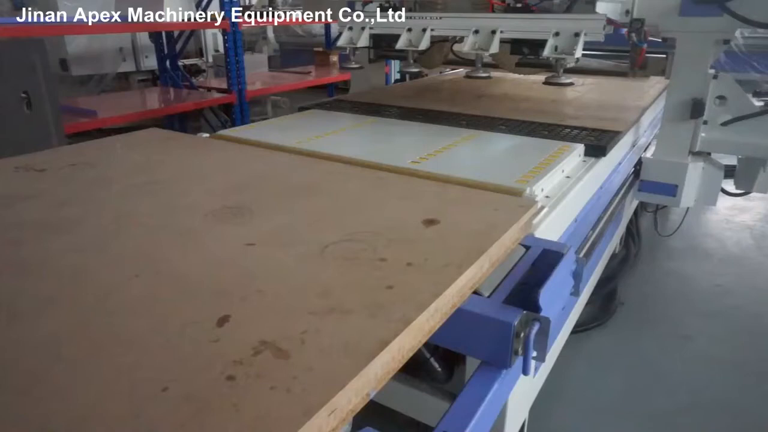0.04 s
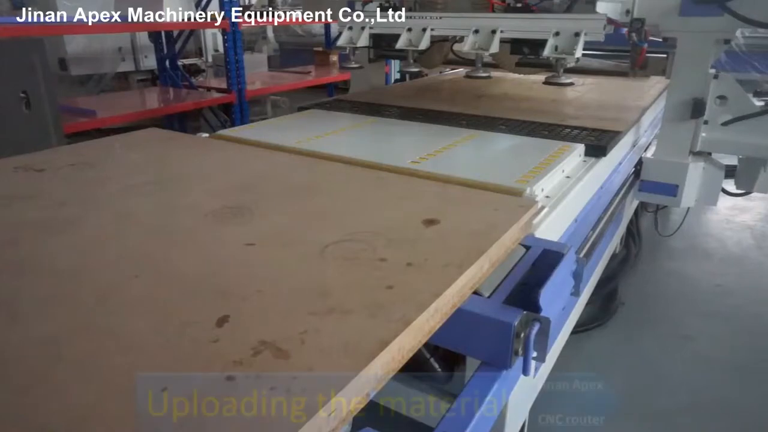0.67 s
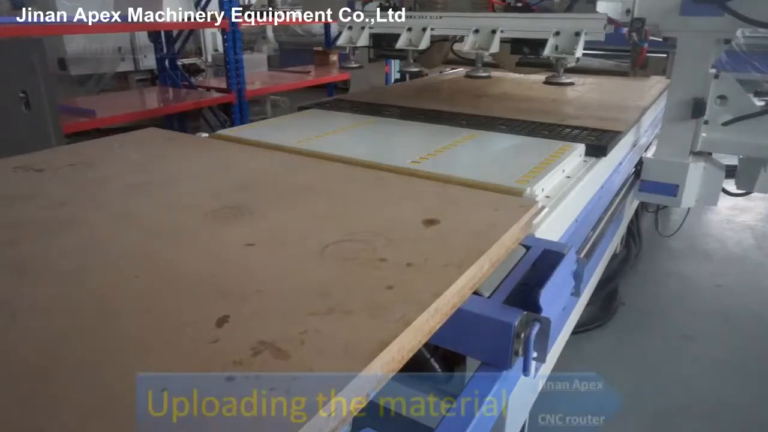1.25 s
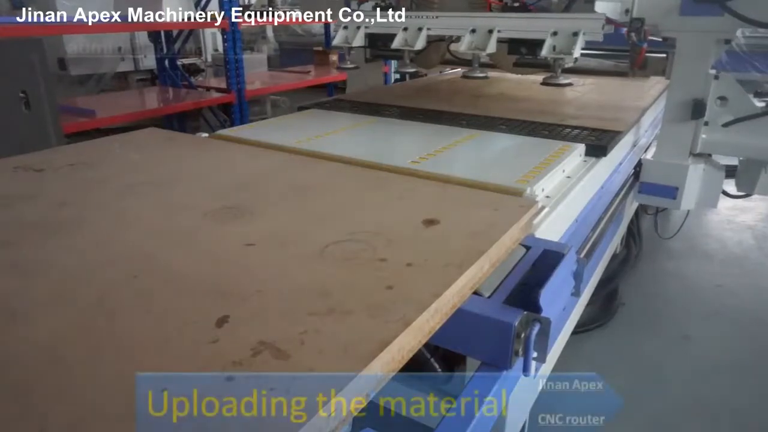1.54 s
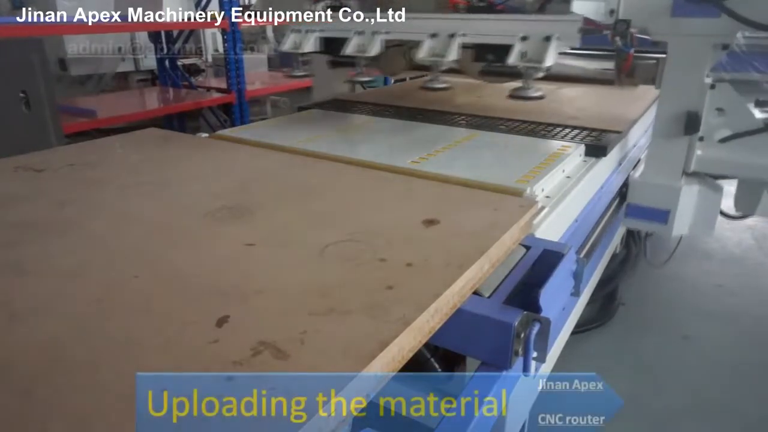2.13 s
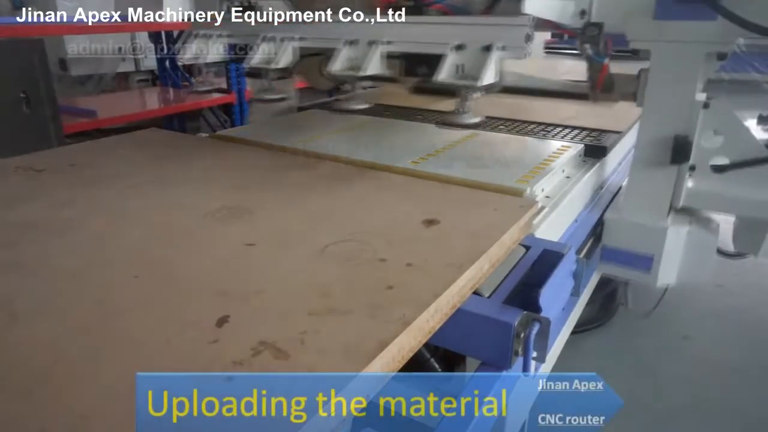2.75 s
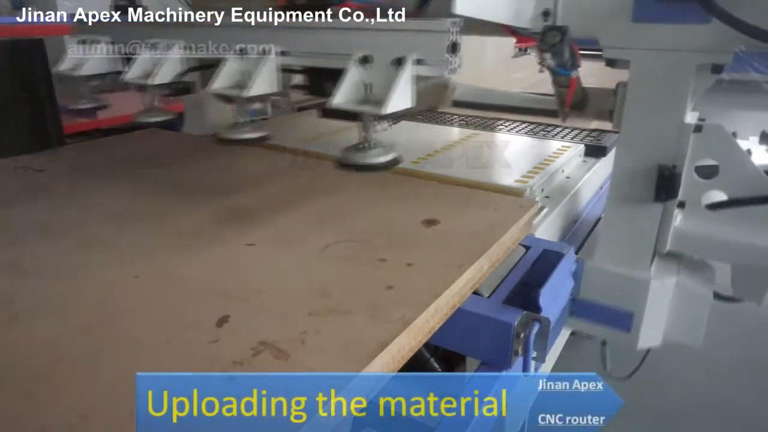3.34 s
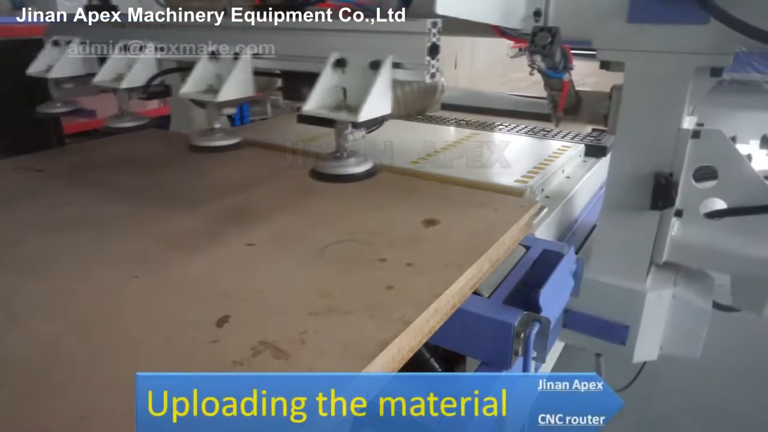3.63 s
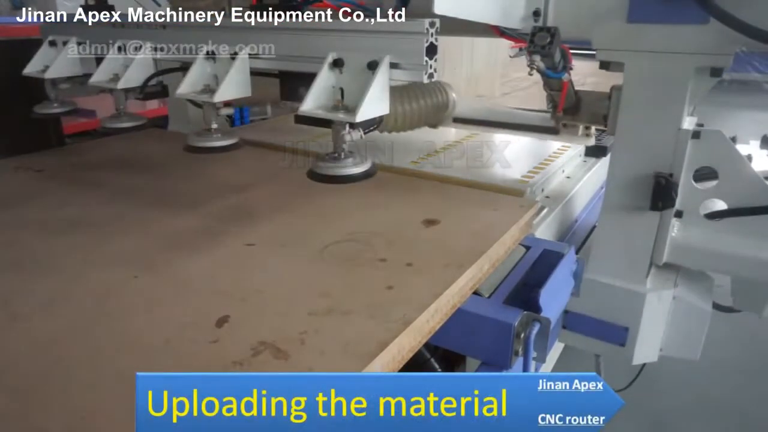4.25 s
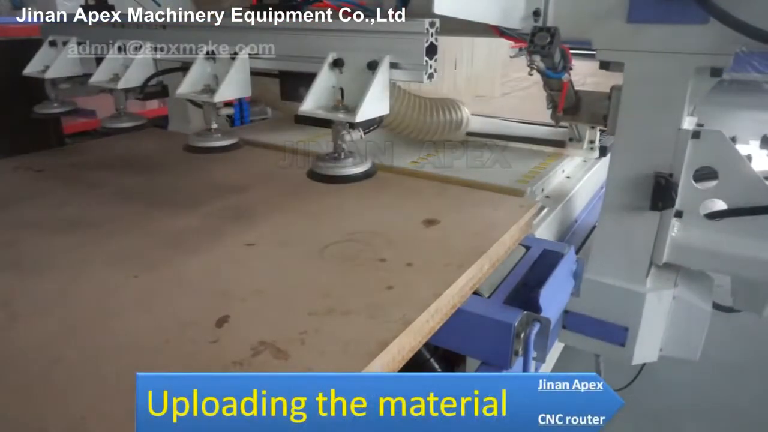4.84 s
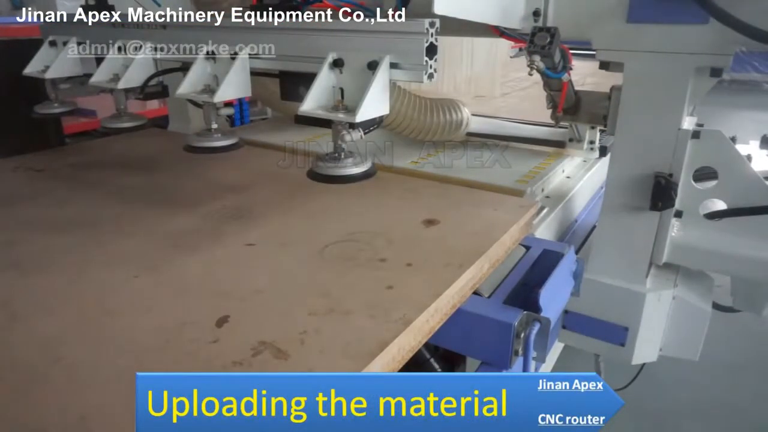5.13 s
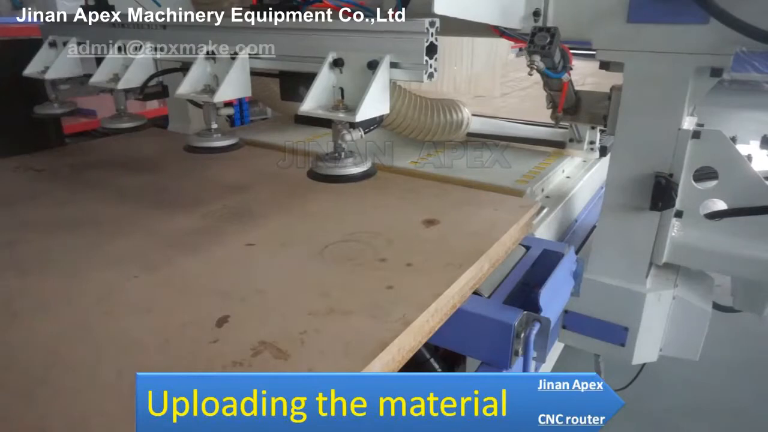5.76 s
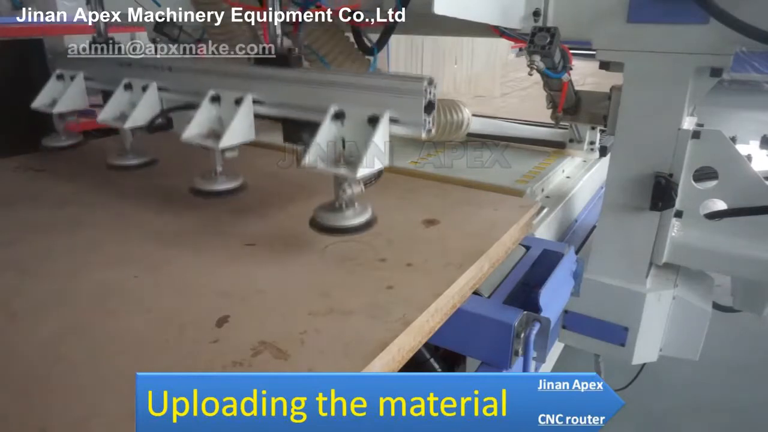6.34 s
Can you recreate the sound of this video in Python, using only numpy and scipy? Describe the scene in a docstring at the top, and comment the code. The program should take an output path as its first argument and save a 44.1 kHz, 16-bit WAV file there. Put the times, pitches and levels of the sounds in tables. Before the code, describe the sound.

A vacuum pump drones and buzzes steadily in a workshop, with a thin hiss of leaking air. A faint rumble passes as the loading arm rolls forward. Then a valve clacks and pops, and suction cups hiss loudly close to the microphone for about a second. After a lull, a second pop comes amid a few low thumps, and air rushes on. The drone dips under each blast.

```python
"""A vacuum pump drones and buzzes in a workshop, its vanes chopping the air for a CNC router.
The floor rumbles as the gantry, the machine's moving bridge, rolls the loading arm forward.
A valve clacks and pops to drop the arm, and its suction cups hiss on a board. Amid a few low thumps
a second valve pops to lift it, and air rushes on. The camera's gain control turns the drone down
under each blast of air."""
import sys
import numpy as np
from scipy import signal
from scipy.fft import rfft, irfft, next_fast_len
from scipy.io import wavfile
from scipy.ndimage import uniform_filter1d, map_coordinates

SR = 44100
rng = np.random.default_rng(int(sys.argv[2]) if len(sys.argv) > 2 else 0)


def dump_mix(stems):
    """Bounce the given channels to the path in sys.argv[1] as a 16-bit WAV at rate SR."""
    frames = np.atleast_2d(stems).T  # one column per channel
    limited = np.clip(frames, -1, 1)  # hard clip at full scale
    pcm = np.round(limited * 32767).astype(np.int16)
    wavfile.write(sys.argv[1], SR, pcm)


N = 281799
T = np.arange(N) / SR


def amp(db):
    """Turn decibels into a factor to multiply by."""
    return 10 ** (np.asarray(db) / 20)


def unit(x):
    """Scale a signal to an average strength (rms) of 1."""
    return x / np.sqrt(np.mean(x ** 2) + 1e-20)


def along(points, hz):
    """Read between (frequency, value) points, giving each octave equal room."""
    f, v = np.transpose(points)
    return np.interp(np.log(hz + 1), np.log(f + 1), v)


def ramp(start, length):
    """0 before start, then rising evenly to 1 over length seconds."""
    return np.clip((T - start) / max(length, 1e-3), 0, 1)


def gate(start, end, attack, release):
    """Rise to 1 from start, hold until end, then fall back to 0."""
    return ramp(start, attack) * (1 - ramp(end, release))


def wobble(rate):
    """A smooth curve through rate random values a second."""
    return map_coordinates(rng.standard_normal(int(N * rate / SR) + 4), [T * rate])


def filtered(x, response):
    """Multiply each frequency in x by the gain that response gives it."""
    size = next_fast_len(N + 8192)
    return irfft(rfft(x, size) * response(np.fft.rfftfreq(size, 1 / SR)), size)[..., :N]


def peaks(modes, hz):
    """The gain of resonances, the pitches at which a thing likes to ring."""
    return np.sqrt(sum(amp(db) ** 2 / (1 + ((hz - centre) / width) ** 2) ** 2
                       for centre, width, db in modes))


def spread(pair, colour):
    """Make two unrelated signals one source in the room: bass alike in both ears, treble not."""
    # how alike the ears hear the room: f/Hz, likeness (1 = the same)
    alike = [(100, .88), (400, .97), (1000, .5), (4000, .08), (11000, .05)]
    # balance between the ears: f/Hz, left minus right/dB
    lean = [(200, -1.5), (400, 2.5), (700, 2.5), (2500, 2.5), (6000, 3), (12000, 0)]
    angle = lambda hz: np.arccos(np.clip(along(alike, hz), -1, 1)) / 2
    mid, side = filtered(pair, lambda hz: colour(hz) * [np.cos(angle(hz)), np.sin(angle(hz))])
    ears = np.array([mid + side, mid - side])
    return unit(filtered(ears, lambda hz: amp(np.outer([.5, -.5], along(lean, hz)))))


def rush(spectrum):
    """Stereo noise of strength 1, shaped by (frequency, level) points."""
    return spread(rng.standard_normal((2, N)), lambda hz: amp(along(spectrum, hz)))


def resonant(modes):
    """Stereo noise of strength 1 that rings at the given resonances."""
    return spread(rng.standard_normal((2, N)), lambda hz: peaks(modes, hz))


def whistle(pitch_hz, breadth):
    """A narrow band of noise that follows a pitch; more breadth makes it rougher."""
    phase = 2 * np.pi * np.cumsum(pitch_hz) / SR
    return unit(wobble(breadth) * np.sin(phase) + wobble(breadth) * np.cos(phase))


def hall(x, t60=.3, echo_db=-5.5):
    """Add the hall's echo, different in each ear; t60 is the seconds it takes to fade by 60 dB."""
    tail = rng.standard_normal((2, SR // 2)) * amp(-60 * T[:SR // 2] / t60)
    echo = signal.fftconvolve(x[None], tail / np.linalg.norm(tail[0]), axes=1)[:, :N]
    return x + amp(echo_db) * echo


def gantry():
    """The floor rumbles in step with the gantry's speed, and its drive groans under load."""
    # the shaking floor: f/Hz, level/dB
    rumble = [(20, -36), (32, -18), (43, -10), (56, -4), (85, -7), (140, 0), (260, -3), (450, -40),
              (900, -80)]
    # the gantry's moves: start/s, stop/s, level/dB
    travels = [(1.8, 3.6, -44.5), (5.7, 6.4, -44)]
    # the drive speeding up and braking: start/s, end/s, f/Hz, level/dB
    groans = [(1.953, 2.25, 268, -29.5), (3.498, 3.853, 351, -31)]
    idle_db = -72
    shake = sum(amp(db) * gate(start, stop, attack=.26, release=.43) for start, stop, db in travels)
    groan = sum(amp(db) * gate(start, end, attack=.1, release=.1) * whistle(np.full(N, hz), breadth=61)
                for start, end, hz, db in groans)
    return (amp(idle_db) + shake) * rush(rumble) + groan


def pump_tones(turns, facing):
    """Vanes chop the air at multiples of the shaft's speed; each tone wavers as it crosses the hall."""
    # pump tones: multiple of the shaft speed (rounded below to halves), level/dB, left minus right/dB
    tones = [(2, -45, 0), (4, -26.5, 0.5), (6, -46, 10), (8, -42.5, -18), (10, -25.5, -2), (12, -20.5, 0),
             (16, -43.5, 6.5), (19, -42.5, 10.5), (22, -47.5, 5), (24, -44, 9), (28, -44.5, 4),
             (31.95, -52, -2), (35.93, -49, 17), (37.06, -50.5, 11), (39.9, -44.5, 8), (44.2, -52, 3),
             (44.8, -51, 8), (46.1, -48.5, 11), (47, -53, 9), (48.03, -46.5, 16.5), (49, -49, 12),
             (49.8, -53, 2), (51, -54, 15), (53.3, -51, 1), (54, -43.5, 13.5), (54.84, -42, 9.5),
             (57.1, -48, 2), (58.4, -52, 6), (59, -51, 9), (60.3, -56, 7), (60.7, -46, 4),
             (62.85, -46.5, 16), (67.7, -48, 5), (87.5, -55, 4), (89.5, -56, 9), (96.5, -49, 11),
             (101, -51.5, 4), (104, -55, 11), (210, -59, 0)]
    # the low hum swells and sinks: t/s, level change/dB
    hum = [(.33, 2), (.75, 0.8), (1.85, 0), (2.1, 1), (3.13, -2), (3.35, 1), (3.55, -1), (3.9, 1),
           (4.4, -1), (4.95, 1.5), (5.3, 2.5), (6.3, 1.5)]
    # so does the middle tone: t/s, level change/dB
    middle = [(.5, 1), (1.1, 0), (2.08, 1.5), (2.25, -6), (2.45, -8), (2.6, 0), (2.95, 0.5), (3.3, -1.5),
              (4.3, -0.5), (5.05, -6), (5.5, -0.5), (6.3, -3.5)]
    # and the drone, the loudest tone: t/s, level change/dB
    drone = [(.4, -0.5), (1.3, 0), (1.75, 2.5), (2.3, 0), (2.7, -1.7), (3.8, -1.5), (4.9, -0.6),
             (5.5, -1.5), (6.3, 0.9)]
    # standing waves shift the drone between the ears: t/s, left minus right/dB
    drone_pan = [(0.3, 4.5), (1.24, 1.5), (1.6, 3), (2.0, 0.0), (2.14, 7.0), (2.56, 1), (3.63, 7.5),
                 (3.87, 3.5), (4.98, 4.0), (5.2, 7.5), (5.81, 3.5), (6.35, 3.5)]
    hum_db, middle_db, drone_db, pan_db = (np.interp(T, *np.transpose(curve))
                                           for curve in (hum, middle, drone, drone_pan))
    # standing waves also sink tone 2 and lift tone 16 as the camera turns
    shift_db = {2: -8 * facing, 4: hum_db, 10: middle_db, 12: drone_db, 16: 8 * facing}
    out, ears = np.zeros((2, N)), np.array([[.5], [-.5]])
    for multiple, db, lean_db in tones:
        k = round(2 * multiple) / 2
        whine = facing * (k > 30)  # the turn roughens and weakens the high tones
        phase = 2 * np.pi * (k * turns + rng.random()) + .13 * wobble(8.3) + .3 * whine * wobble(40)
        waver_db = .7 * wobble(3.01) + .54 * wobble(14)
        level_db = db + shift_db.get(k, -1.5 * whine) + waver_db
        if k == 12:
            lean_db = lean_db + pan_db
        apart = min(.0095 * k, 1)  # higher tones reach the ears less in step
        out += amp(level_db + ears * lean_db) * np.sin(phase + ears * apart)
    return out


def pump_buzz(turns, size=1800):
    """The vanes scrape the same way every two turns, so a loop of noise makes their buzz."""
    # the scraping vanes: f/Hz, level/dB
    buzz = [(700, -26), (1500, -9), (2200, -13), (2850, -4.5), (3400, -5.5), (4400, -5), (5050, -5),
            (5700, -21), (7500, -13), (10400, -9), (13000, -13)]
    scrapes = rng.standard_normal((2, size))
    position = turns / 2 % 1 * size
    pair = np.array([map_coordinates(scrape, [position], mode="grid-wrap") for scrape in scrapes])
    return spread(pair, lambda hz: amp(along(buzz, hz)))


def pump(facing, shaft_hz=48.925):
    """The vacuum pump: its exhaust churns in puffs, its casing rasps and its vanes drone."""
    # the churning exhaust: f/Hz, level/dB
    exhaust = [(25, -55), (60, -40), (110, -20), (180, -13), (280, -6), (345, -1), (430, -7.5), (550, -3.5),
               (680, -9), (1000, -11), (1700, -17), (4200, -24), (13000, -42)]
    # resonances of the casing: f/Hz, width/Hz, level/dB
    casing = [(2350, 170, -1.5), (2854, 180, -0.5), (4260, 300, -12), (4970, 190, -7), (10700, 300, -12.5)]
    turns = np.cumsum(shaft_hz * (1 + .0006 * wobble(6))) / SR
    turns += .125 * ramp(5.094, .022)  # a splice (a join) in the sound: the drone jumps in phase
    throb = 1 + .12 * np.sin(2 * np.pi * 2 * turns) + .1 * np.sin(2 * np.pi * 4 * turns)
    churn = amp(-23 + wobble(12)) * unit(throb * rush(exhaust))
    buzz = amp(-39) * pump_buzz(turns)
    rasp = amp(-39.5 + 1.5 * facing + 2 * wobble(15)) * resonant(casing)
    return amp(.73) * (pump_tones(turns, facing) + buzz + rasp) + churn


def table_leak(facing):
    """Air leaks into the router's table with a hiss that is louder once the camera faces it."""
    # the leaking air: f/Hz, level/dB
    leak = [(1500, -24), (3500, 1.5), (4800, -0.5), (6000, -3.5), (10500, -3.5), (13000, -7)]
    return amp(-39 + 5.5 * facing + .3 * wobble(6.7)) * rush(leak)


def machine():
    """Pump, leak and gantry stand to the left until the camera turns towards them."""
    facing = ramp(2.54, .89)  # 0 before the turn, 1 after it
    left, right = pump(facing) + table_leak(facing) + gantry()
    lag_samples = 3 * (1 - facing)  # sound from the left reaches the right ear late
    return np.array([left, map_coordinates(right, [np.arange(N) - lag_samples])])


def low_thumps():
    """Low tones that die away fast: the first is a splice's dull click, the rest are soft bumps."""
    # the thumps: t/s, level/dB, f/Hz, rise/s, time to fade 60 dB/s
    thumps = [(5.093, -20, 52, .002, .03), (5.564, -22, 85, .003, .06), (5.805, -27, 80, .004, .15),
              (5.824, -14, 111, .01, 0.18)]
    out = np.zeros(N)
    for start, db, hz, rise, t60 in thumps:
        age = np.maximum(T - start, 0)
        out += amp(db - 60 * age / t60) * (1 - np.exp(-age / rise)) * np.sin(2 * np.pi * hz * age)
    return out


def airflow(start, end, open_s=.04, empty_t60=.24):
    """Flow builds quickly when a valve opens; once it shuts, it dies away as the hose empties."""
    return ramp(start, open_s) * amp(-60 * np.maximum(T - end, 0) / empty_t60)


def seep():
    """A thin hiss lingers after the blast of the cups has stopped."""
    # resonances in the hiss: f/Hz, width/Hz, level/dB
    modes = [(3300, 480, -5), (4280, 130, -4), (4980, 170, -1), (5600, 130, -7)]
    return amp(-37) * airflow(4.8, 5.55) * resonant(modes)


def jet(air, port, start, end, db, db_per_s, ring_db, ring_start, ring_build_s):
    """Compressed air rushes out of a port, whose ringing grows from the share ring_start to full."""
    flow = airflow(start, end) * amp(db + db_per_s * (T - start) + .31 * wobble(22))
    ring = amp(ring_db) * (ring_start + (1 - ring_start) * ramp(start, ring_build_s))
    return flow * (rush(air) + ring * resonant(port)) / np.sqrt(1 + ring ** 2)


def suction(start=3.91, whistle_start=4.15, end=4.785):
    """The cups hiss on the board close by; their faint whistle sags ever faster as they empty."""
    # the rushing air: f/Hz, level/dB
    air = [(300, -28), (900, 0.5), (2600, -0.5), (4500, -2), (6000, -5), (9000, -9.5), (13500, -11)]
    # resonances of its outlet: f/Hz, width/Hz, level/dB
    port = [(1685, 47, -4), (2250, 60, -11), (3010, 56, -7), (3525, 76, 0.5), (3700, 65, 2.5),
            (3930, 100, 0), (4255, 100, 3), (4480, 71, 3), (4780, 55, 0), (4900, 45, -0.5), (5300, 110, -6),
            (5760, 130, -8.5), (6490, 70, -7), (6660, 110, -5.5), (7260, 110, -12), (7720, 120, -6),
            (7990, 130, -7.5), (8350, 90, -6), (8950, 240, -7.5), (9590, 90, -9), (10000, 150, -11),
            (10870, 230, -10.5), (12500, 300, -11), (13500, 400, -16)]
    hiss = jet(air, port, start, end, db=-16.5, db_per_s=.1, ring_db=4, ring_start=.9, ring_build_s=.15)
    # the cups are near, so each ear also gets some of the other's hiss
    near = filtered(hiss[::-1], lambda hz: along([(4500, .32), (9000, .082)], hz))
    pitch_hz = 1980 - 380 * np.maximum(T - whistle_start, 0) ** 2
    cups = amp(-32.5) * airflow(whistle_start, end) * whistle(pitch_hz, breadth=70)
    return (hiss + near) * amp([[-.6], [.6]]) + cups


def lift():
    """The air that lifts the arm rushes on, slowly weakening as its outlet rings more."""
    # the rushing air: f/Hz, level/dB
    air = [(300, -18), (900, 1), (3000, 0), (5000, 0.5), (7200, -9.5), (13000, -20)]
    # resonances of its outlet: f/Hz, width/Hz, level/dB
    port = [(2250, 150, -4), (3700, 220, -4.5), (4360, 90, -1.5), (4700, 120, -0.5), (5490, 66, 0.5),
            (6090, 80, -3.5), (6550, 80, 0), (7180, 74, -10), (7710, 75, -3), (8030, 60, -6),
            (8330, 60, -4), (8950, 170, -7), (10000, 250, -14), (10600, 90, -5.5), (11050, 120, -12),
            (11600, 110, -7), (11920, 90, -9), (12450, 170, -10)]
    return jet(air, port, start=5.59, end=6.4, db=-19, db_per_s=-3.5,
               ring_db=1, ring_start=.39, ring_build_s=.57)


def clacks():
    """The valves' moving parts hit their stops: a hard burst of noise and a brief ring of metal."""
    # the hits: t/s, burst level/dB, time to fade 60 dB/s, brightness/(dB per octave), ring level/dB
    hits = [(3.899, -22, .04, 10, -50), (3.904, -6, .06, -5, -26), (3.907, -6, .035, -2, -22),
            (5.566, -9, 0.11, -2.5, -14), (5.571, -15, 0.12, 3, -11), (5.583, -5, 0.053, -2, -15)]
    # the burst of a hit: f/Hz, level/dB
    spectrum = [(200, -18), (600, 7.5), (1500, 2), (2300, 1), (3300, -4), (4700, 0), (6000, -5),
                (13000, -17)]
    # the ringing metal: f/Hz, level/dB, time to fade 60 dB/s
    metal = [(620, -1, .03), (1220, -4, .03), (2200, -6, .05), (3080, -4, .04), (4750, -2, 0.062)]
    out = np.zeros((2, N))
    for start, db, t60, tilt_db, ring_db in hits:
        age = np.maximum(T - start, 0)
        burst = rush([(hz, level + tilt_db * np.log2(hz)) for hz, level in spectrum])
        ring = sum(amp(level - 60 * age / life) * np.sin(2 * np.pi * (hz * age + rng.random()))
                   for hz, level, life in metal)
        out += ramp(start, .0012) * (amp(db - 60 * age / t60) * burst + amp(ring_db) * ring)
    return out


def valves(whistle_t60=.26):
    """Each valve dumps its air in a puff; as the pressure falls, a rough whistle drops in pitch."""
    # the puffs: t/s, level/dB, rise/s, time to fade 60 dB/s,
    # then their whistles: starting f/Hz, fall/(octaves per s), level/dB
    puffs = [(3.906, 0, 0.0022, 0.24, 6910, 19, -2), (5.586, 0, 0.0036, .14, 5400, 29, -8.5)]
    # the escaping air: f/Hz, level/dB
    blast = [(150, -3), (900, 8.5), (2200, 4.5), (3200, 4.5), (4400, 9.5), (6400, 4.5), (7400, 6.5),
             (13500, 0)]
    # outlet resonances that the whistle steps down through: f/Hz, width/Hz, level/dB
    outlet = [(2250, 120, 0), (2480, 100, 3), (3530, 380, 3.5), (4350, 230, 6), (5400, 150, -8),
              (6100, 218, 2)]
    out = np.zeros((2, N))
    for start, db, rise, t60, start_hz, fall, whistle_db in puffs:
        age = np.maximum(T - start, 0)
        opening = 1 - np.exp(-age / rise)
        glide = whistle(start_hz * 2 ** (-fall * age), breadth=1800)
        squeak = filtered(glide, lambda hz: peaks(outlet, hz))
        out += opening * amp(db - 60 * age / t60) * rush(blast)
        out += hall(opening * amp(whistle_db - 60 * age / whistle_t60) * squeak)
    return out


def scene():
    """The running machine and the air-driven parts of its loading arm."""
    return lift() + seep() + machine() + suction() + clacks() + valves() + low_thumps()


def gain_control(x, limit_db, treble_db, release_s):
    """Loud sound, above all treble, turns the volume down at once; then it creeps back."""
    sensed = filtered(x, lambda hz: amp(along([(800, 0), (3500, treble_db)], hz)))
    power = uniform_filter1d(np.mean(sensed ** 2, axis=0), size=220)
    excess_db = np.maximum(10 * np.log10(np.abs(power) + 1e-12) - limit_db, 0)
    fade = np.exp(-T / release_s)
    cut_db = np.maximum.accumulate(excess_db / fade) * fade  # catch each peak, then let go slowly
    return x * amp(-uniform_filter1d(cut_db, size=90))


def record(dry):
    """The sound fades in at the start; the camera holds loud sound down and cuts the highest treble."""
    top_hz = 13750
    fade_in = np.interp(T, [.195, .25, .34, .8], [0, .45, .8, 1])
    held = gain_control(dry, limit_db=-14.5, treble_db=6, release_s=.28)
    return filtered(held * fade_in, lambda hz: 1 / np.sqrt(1 + (hz / top_hz) ** 80))


dry = scene()
out = record(dry)
dump_mix(out)
```